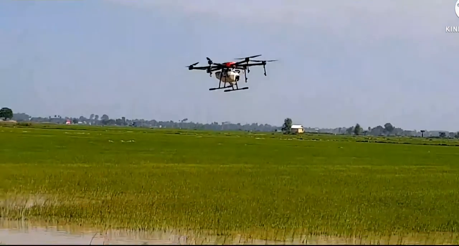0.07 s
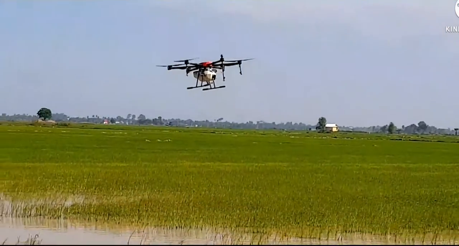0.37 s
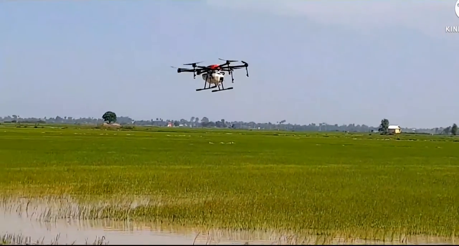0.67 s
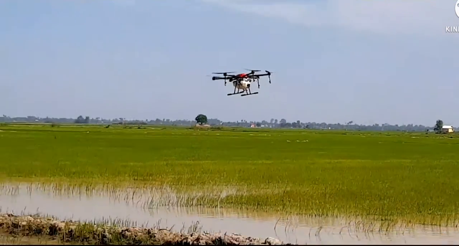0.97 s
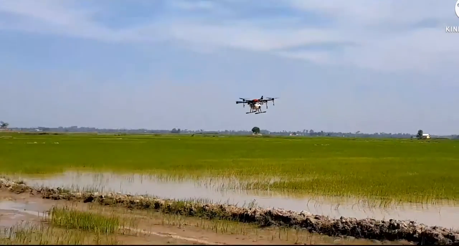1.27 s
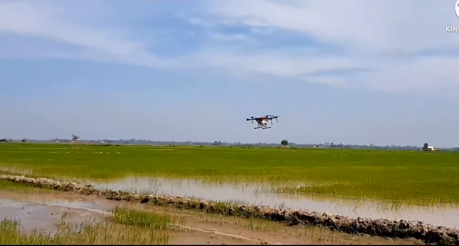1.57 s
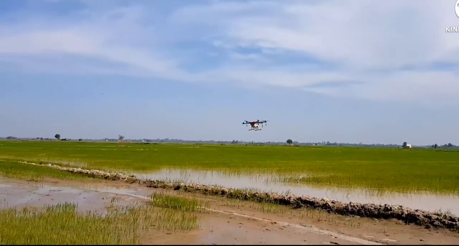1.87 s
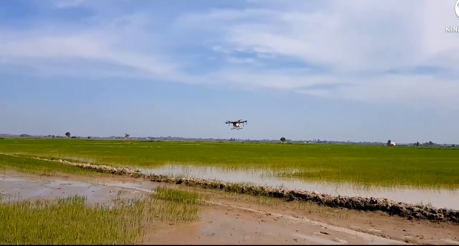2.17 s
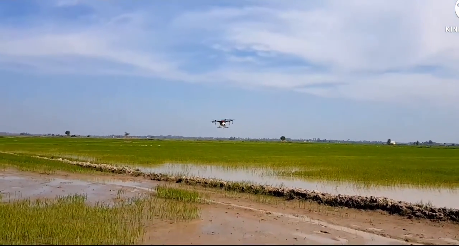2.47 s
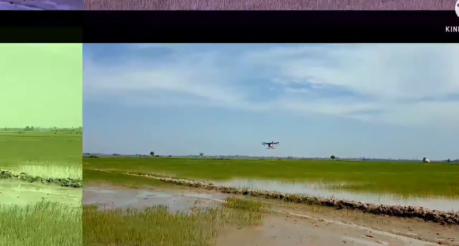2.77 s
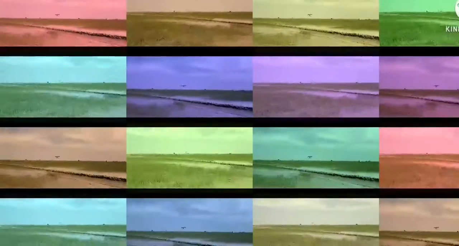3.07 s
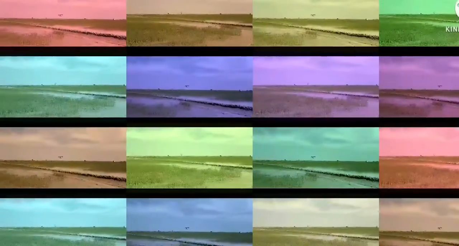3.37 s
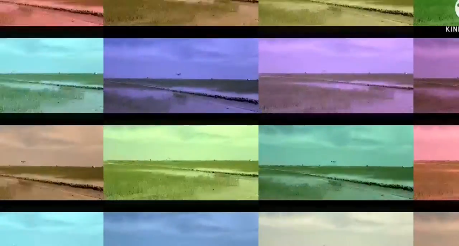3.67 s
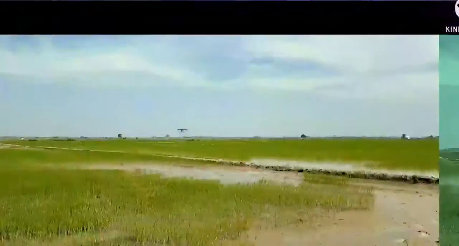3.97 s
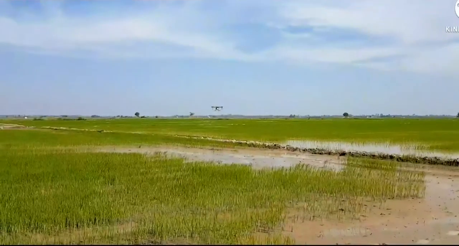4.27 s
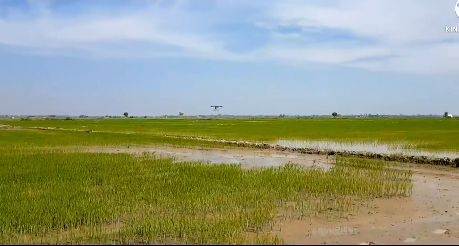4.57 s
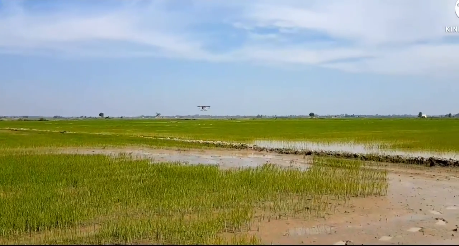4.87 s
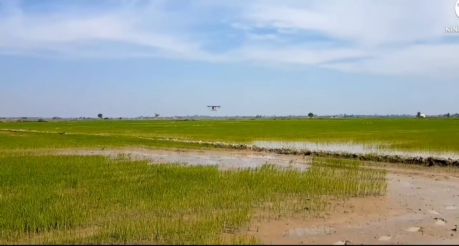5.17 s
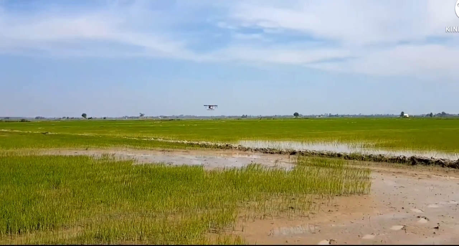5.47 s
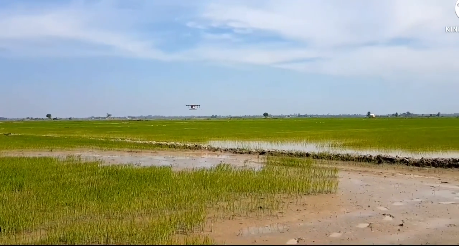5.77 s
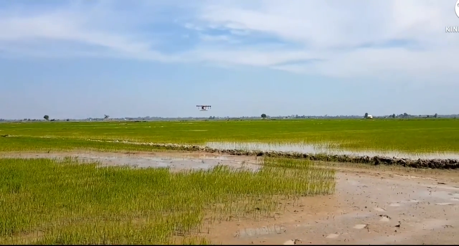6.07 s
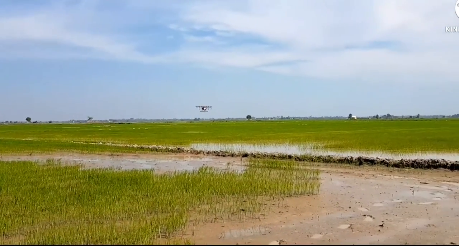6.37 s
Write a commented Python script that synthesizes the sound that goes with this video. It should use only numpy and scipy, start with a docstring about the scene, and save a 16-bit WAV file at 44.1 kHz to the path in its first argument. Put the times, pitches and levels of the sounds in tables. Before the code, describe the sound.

From the start, a six-rotor farm drone buzzes roughly, close by over open fields. Its rotors throb against each other, the blades chop the air, and the motors add a thin whine and a wavering whistle. Gusts of wind rumble on the microphone. Between about 1.2 and 2.7 seconds, sharp pops and crackles hit the microphone, mostly on the right, loudest near 1.2 and 2 seconds. A dull wind thump follows near 2.9 seconds. The buzz swirls gently upward as the drone leaves, then fades from about 3 to 4.3 seconds while the gusts die down, with a few faint knocks around 4 seconds. After that the drone is far away and much quieter, a thin, higher hum with a faint whine and hiss. A light breeze, faint crackle and soft thumps continue until the end, with a stronger thump at about 6.5 seconds.

```python
"""First you hear the rough buzz of a six-rotor farm drone hovering close by over rice fields. Its rotors throb
against each other, their blades chop the air, and the motors whine on top. The echo off the flooded field makes
the buzz swirl upward as the drone flies off. Then the scene changes: the near sound fades out while a thin,
higher drone from far away fades in. Wind rumbles, crackles and bumps on the microphone throughout."""
import sys
import numpy as np
from scipy import signal
from scipy.fft import rfft, irfft
from scipy.io import wavfile
from scipy.ndimage import uniform_filter1d

SR = 44100
rng = np.random.default_rng(int(sys.argv[2]) if len(sys.argv) > 2 else 0)


def log_audio(samples):
    """Write samples as a 16-bit WAV file to the path given in sys.argv[1]."""
    # one column per channel
    frames = np.atleast_2d(samples).T
    # limit to full scale, then quantise
    limited = np.clip(frames, -1, 1)
    pcm = np.round(limited * 32767).astype(np.int16)
    wavfile.write(sys.argv[1], SR, pcm)


N = 291942
T = np.arange(N) / SR
HZ = np.fft.rfftfreq(N, 1 / SR)
FAR_FROM_S, NEAR_UNTIL_S = 3, 4.31  # the far sound fades in between these times

# Tone colours of the wind. Each row: frequency in Hz, gain in dB.
GUST_COLOUR = [(15, -8), (30, -12), (45, -4), (62, 2.5), (100, -8.5), (135, -6), (200, -16), (300, -15.5),
               (600, -52.5)]
BREEZE_COLOUR = [(15, -29), (40, -8), (80, -5), (115, -4), (160, -12.5), (240, -24.5), (400, -27.5),
                 (900, -56), (4000, -78)]
EDDY_COLOUR = [(20, -34), (80, 4), (130, -4.5), (250, -14.5), (420, -15.5), (800, -51), (3000, -80)]
NEAR_CRACKLE_COLOUR = [(100, -21), (300, 1.5), (600, 1.5), (1200, -4.5), (2600, -7), (4200, -21),
                       (7000, -50)]
FAR_CRACKLE_COLOUR = [(130, -41), (300, -8), (550, 4.5), (900, -5), (1500, -26), (3000, -34), (6000, -60)]
# Strength of the crackle. Each row: time in seconds, level in dB.
NEAR_CRACKLE_DB = [(0, -60), (1.2, -60), (1.5, -50.5), (1.9, -45.5), (2.1, -40.5), (2.45, -43),
                   (2.8, -47.5), (3.3, -57), (3.95, -64), (4.3, -73)]
FAR_CRACKLE_DB = [(4.3, -64.5), (4.9, -65), (5.5, -63), (6.05, -61), (6.62, -59)]
# Gusts. Each row: time of the peak in seconds, length in seconds, level in dB.
WIND_GUSTS = [(0.142, .2, -42.5), (0.808, 0.33, -41), (1.189, 0.12, -38.5), (1.65, 0.86, -38.5),
              (2.314, 0.17, -39), (2.84, 0.45, -42), (3.331, .16, -40.5), (3.771, 0.32, -47.5)]
# Thumps of wind. Each row: start in seconds, level in dB, ring pitch in Hz.
WIND_THUMPS = [(2.867, -24, 80.1), (4.575, -37.5, 108.2), (4.76, -37, 126), (5.047, -34, 120),
               (5.137, -36, 113), (5.225, -31.5, 98), (5.246, -52, 112), (5.771, -38, 122),
               (5.901, -40.5, 97), (6.04, -34.5, 132), (6.076, -35, 109.1), (6.369, -39, 100),
               (6.44, -41, 101.2), (6.532, -25, 116)]
# Sharp pops and knocks on the microphone, mostly on the right.
# Each row: start in seconds, level in dB, ring pitch in Hz, click gain in dB, top of the click in Hz,
# left minus right in dB, swings of the ring, scuff from 0 to 1.
SHARP_MIC_POPS = [(1.2173, -13, 386.5, -9, 1490, -23, 6.9, 0.06),
                  (1.2217, -14.5, 132, -6.5, 2900, -31, 3.5, 0.04),
                  (1.549, -27, 503, 1, 3504, -20, 4, 0.02), (1.688, -30, 424, -10, 2400, -22, 5, 0.04),
                  (1.7604, -24, 111.1, 0, 3145, -8, 4.2, 0.1),
                  (1.8254, -27, 590, 2.5, 3576, -22, 4.83, 0.01),
                  (1.9686, -19.5, 424.5, -17, 1514, -30, 6.4, 0.1),
                  (1.9709, -14, 84, -10.5, 3230, -30, 7, 0.22), (2.3212, -25, 2300, 8, 5800, -26, 5, 0.05),
                  (2.478, -40, 448, -5, 1450, -22, 4.8, 0.3), (2.648, -22, 481, -2.5, 1380, -26, 5.6, 0.04),
                  (2.653, -28, 420, -4, 997, -26, 4, 0.07), (3.898, -39.5, 300, -5, 1302, -14, 4.6, 0.12),
                  (3.9308, -35, 222, -8, 1194, -22, 5.2, 0.2),
                  (3.9745, -38, 303.4, -3.5, 1390, -22, 5.1, 0.09),
                  (4.015, -33, 277, -6.5, 1200, -14, 5, 0.1),
                  (4.092, -47, 305, -3.5, 1009, -16.5, 5.2, 0.26),
                  (4.879, -44, 510, -12, 1500, -17, 9.3, 0.03), (5.177, -41, 946, -8, 2200, 2, 9.5, 0.18),
                  (6.33, -39, 600, -9, 1600, -20, 6.1, 0.1)]

# Speeds of the three rotor pairs, far and near. Each row: time in seconds, blade passes per second.
FAR_FAST_PAIR = [(4.1, 138), (4.7, 140), (5.2, 134.7), (5.5, 135.2), (5.9, 133.6), (6.25, 137.6),
                 (6.62, 133.4)]
FAR_MIDDLE_PAIR = [(4.099, 124.9), (4.851, 125.5), (5.202, 127), (5.501, 127.5), (6.203, 126.6),
                   (6.62, 125.1)]
FAR_SLOW_PAIR = [(4.098, 120.8), (5, 121.9), (5.7, 121.5), (6.62, 121.2)]
NEAR_FAST_PAIR = [(0, 90), (.3, 90.37), (.8, 89), (1.2, 88.55), (1.6, 87.28), (2, 86.42), (2.6, 87.72),
                  (2.9, 87.54), (3.3, 88.35), (4.3, 88.9)]
NEAR_MIDDLE_PAIR = [(0, 80.56), (0.503, 80.3), (1, 79.22), (1.605, 77.5), (2.3, 78.66), (3, 79.43),
                    (3.399, 80.53), (4.297, 80.1)]
NEAR_SLOW_PAIR = [(0, 78.1), (0.496, 76.78), (1.001, 75.37), (1.6, 74.42), (2.401, 74.3), (3.303, 75.7),
                  (4.301, 75.8)]
# Tones of the rotors' hum and the motors' magnetic whine. Each row: multiple of the blade-pass rate,
# then relative level in dB for the fast, middle and slow pair.
FAR_HUM_TONES = [(1, -7.5, -8, -0.5), (2, -5, -25, -16), (3, -16.5, -15, -13), (4, -9.5, -9, -7),
                 (6, -18, -16.5, -21)]
NEAR_HUM_TONES = [(1, 1, 6.5, -2.5), (2, -4, -7, -10.5), (3, -26.5, -24, -11.5), (4, -26, -28, -19.5)]
MAGNETIC_TONES = [(28, -28, -30, -40), (32, -33, -40, -18)]
# Tone colours of the drone's buzz and hiss. Each row: frequency in Hz, gain in dB.
FAR_BUZZ_COLOUR = [(130, -17), (220, -4), (275, -12.5), (296, -57), (371, -8.5), (439, -11), (499, -3),
                   (586, -19.5), (1500, -32), (1950, -28), (3300, -120)]
FAR_HISS_COLOUR = [(710, -52), (1200, -19), (1600, -11), (2090, -7), (2350, -1.5), (2650, -3),
                   (2850, -12.5), (3030, -15.5), (3350, -10.5), (3720, -17.5), (4050, -12.5), (4750, -12.5),
                   (5170, -8.5), (6260, -13.5), (6970, -9.5), (8170, -19), (9500, -23.5), (11500, -24),
                   (15300, -19)]
OVERHEAD_COLOUR = [(110, 0), (190, 0), (205, -22), (311, -22), (423, -24), (611, -3.5), (702, -3),
                   (884, -17.5), (1050, -15), (1360, -19), (1880, -17), (2160, -25.5), (2850, -24.5),
                   (4450, -21.5), (7500, -47.5), (9750, -85), (16500, -120)]
TURNING_COLOUR = [(110, -49), (190, 0), (301, 2.5), (410, -7.5), (681, -1.5), (871, -10.5), (1200, -2.5),
                  (1590, -17), (1910, -7.5), (2090, -17), (2300, -9.5), (2640, -18), (2850, -20.5),
                  (4950, -18.5), (7500, -62.5), (9750, -34.5), (16500, -120)]
LEAVING_COLOUR = [(110, -54), (190, -7.5), (341, 7), (429, -18), (516, -6.5), (566, -19), (692, -12),
                  (1300, -4), (1490, -12), (1790, -5), (2090, -27), (2370, -8), (2640, -19.5), (4510, -14),
                  (7500, -53), (9750, -57), (16500, -120)]
NEAR_HISS_COLOUR = [(3820, -14), (6500, -11.5), (7240, -12.5), (12600, -8.5), (13700, -8), (14600, -16),
                    (15300, -37)]
# Whine of the motors and their controllers.
# Each row: pitch in Hz, relative level in dB, waver as a share of the pitch.
FAR_WHINE_NOTES = [(2340, -8, 0.00307), (2340, -21, 0.011), (2530, -13.5, 0.00773), (5260, -23, 0.012)]
NEAR_WHINE_NOTES = [(13150, -16, .0008), (13380, -16, .0013), (13665, -20, .0008), (14035, -15, .0008),
                    (14145, -18, .0008)]
# Blurred motor tones. Each row: centre in Hz, relative level in dB, width in Hz.
FAR_WHINE_BANDS = [(5110, -11, 280), (6900, -27, 230)]
WHISTLE_BANDS = [(4410, -4.5, 74)]
# How the drone's sounds swell and sink. Each row: time in seconds, gain in dB.
FAR_DRONE_DB = [(4.34, -67.5), (4.75, -65.5), (5.05, -59), (5.5, -61), (5.95, -58), (6.25, -59.5),
                (6.62, -58.5)]
FAR_HUM_AND_BUZZ_DB = [(4.3, -0.5), (4.75, -2), (5, -1.5), (6.6, -1)]
FAR_WHINE_DB = [(4.3, 4), (4.75, 0.5), (5.1, 0.5), (5.5, -0.5), (5.9, 3), (6.15, -3.5), (6.45, 3.5),
                (6.62, -6)]
MOTOR_FACING_DB = [(0, -5), (.3, -5), (1.1, -5.5), (2.4, -1), (2.85, 0), (3.3, -5), (4.3, 2)]  # louder as the motors turn to the listener
WHISTLE_SWELL_DB = [(0, -71), (.15, -66), (.27, -59.5), (.5, -64), (.7, -64), (.95, -69), (1.2, -61),
                    (1.33, -69), (1.52, -58.5), (1.7, -69), (1.95, -68), (2.17, -59), (2.55, -65),
                    (2.85, -56.5), (3.08, -61), (3.25, -66), (3.6, -71), (4.2, -83)]
# Strength of the near drone. Each row: time in seconds, hum gain in dB, buzz gain in dB.
NEAR_DRONE_DB = [(0, -31.5, -43), (.45, -36.5, -42.5), (.85, -34, -41), (1.2, -38.5, -40), (1.6, -37, -40),
                 (2.1, -38, -40.5), (2.45, -34, -43.5), (2.87, -38.5, -43), (3.39, -40.5, -48),
                 (3.9, -47, -57), (4.3, -69, -68.5)]
# Whistle of the loudest motor. Each row: time in seconds, pitch in Hz.
WHISTLE_HZ = [(0, 4405), (.27, 4448), (.7, 4410), (1.2, 4392), (1.55, 4366), (2.05, 4360), (2.3, 4392),
              (2.55, 4392), (2.85, 4362), (3.1, 4380), (3.35, 4432), (4.2, 4432)]
# Steady bright bands in the buzz. Each row: centre in Hz, width in Hz, boost in dB.
BUZZ_PEAKS = [(1538, 42, 6), (2265, 91, 3), (2870, 200, 6.5), (3440, 300, 4), (3990, 150, 3),
              (4780, 200, 0.5), (5800, 620, 7)]
# The flight. Each row: time in seconds, stage (0 is overhead, 1 turning, 2 leaving).
FLIGHT_STAGE = [(.7, 0.19), (1.9, 0.64), (3.2, 1.734)]
# Echo off the flooded field. Each row: time in seconds, lag behind the direct sound in seconds.
ECHO_LAG = [(0, .00118), (1, .00109), (1.9, .001), (2.5, .0009), (3.1, .00085), (4.3, .00083)]

# How alike left and right are. Each row: frequency in Hz, likeness (0 is unrelated, capped at 0.99).
GUST_LIKENESS = [(30, 0.18), (70, 0.43), (200, 0.72)]
FAR_LIKENESS = [(60, 0.14), (150, 0.1), (380, 0.99), (940, 0.39), (2370, 0.49), (5940, 0.84), (8500, 0.77),
                (14900, 0.2)]
NEAR_LIKENESS = [(60, 0.84), (150, 1.04), (400, 1.1), (1000, 1), (2300, 0.33), (5000, 0.74), (9000, 0.4),
                 (15000, 0.6)]
# How far the left wave runs ahead of the right. Each row: frequency in Hz, lead in radians.
FAR_LEFT_LEAD = [(60, -3.5), (2500, 1), (7000, 1.2), (15000, 7)]
NEAR_LEFT_LEAD = [(60, -0.16), (950, 0.5), (1720, 0.76), (2330, -0.2), (3620, 1.05), (4310, -1.3),
                  (5080, 1.1), (8000, -0.9), (13000, -2), (15000, -1)]
# Balance of the microphone's two openings. Each row: frequency in Hz, left minus right in dB.
FAR_BALANCE = [(60, 26), (150, 32), (380, 7), (550, 0.5), (940, 3.5), (2370, 0), (5940, 0.5), (8500, -1),
               (14900, 17)]
NEAR_BALANCE = [(60, -3.5), (150, -1.5), (380, -1), (940, 2.5), (2370, 2), (5940, 1), (14900, 3)]


def from_db(db):
    """Turns decibels into a factor to multiply by."""
    return 10 ** (np.asarray(db) / 20)


def unit(x):
    """Scales a signal to an average strength (rms) of one."""
    return x / np.sqrt(np.mean(x ** 2) + 1e-20)


def over_time(rows, column=1):
    """Joins one column of a table with straight lines in time."""
    rows = np.asarray(rows)
    return np.interp(T, rows[:, 0], rows[:, column])


def over_frequency(rows):
    """Joins a table's points on a scale where all octaves are equally wide."""
    hz, value = np.transpose(rows)
    return np.interp(np.log(HZ + 1), np.log(hz + 1), value)


def colour(x, shape):
    """Turns each frequency up or down to follow a tone colour."""
    return irfft(rfft(x) * from_db(over_frequency(shape)), N)


def wander(per_s):
    """A smooth random wobble of strength one, moving up to about per_s times a second."""
    steps = len(np.arange(0, N + 64, 64))
    hz = np.fft.rfftfreq(steps, 64 / SR)
    slow = irfft(rfft(rng.standard_normal(steps)) / (1 + (hz / per_s) ** 4), steps)
    return unit(np.interp(np.arange(N), 64 * np.arange(steps), slow))


def stereo(two_signals, likeness, lead, balance):
    """Mixes two unrelated signals into a partly alike left and right, keeping their average's level."""
    first, second = rfft(two_signals)
    same = np.clip(over_frequency(likeness), 0, .99)
    tilt = from_db(over_frequency(balance) / 2)
    shared = same * np.exp(-1j * over_frequency(lead)) / tilt
    own = np.sqrt(1 - same ** 2) / tilt
    mean_gain = np.sqrt(abs(tilt + shared) ** 2 + own ** 2) / 2
    return irfft(np.array([tilt * first, shared * first + own * second]) / mean_gain, N)


def gust_level(breeze_db, gusts):
    """The wind's level in dB: each gust swells and sinks on top of the breeze."""
    power = from_db(breeze_db) ** 2
    for peak_s, length_s, db in gusts:
        power = power + (from_db(db) * np.exp(-2 * ((T - peak_s) / length_s) ** 2)) ** 2
    return 10 * np.log10(power + 1e-20)


def wind(level_db, shape, lumpy_db):
    """Air swirling on the microphone makes a low, lumpy rumble."""
    swirls = colour(rng.standard_normal((2, N)), shape) * from_db(lumpy_db * wander(51))
    return unit(swirls) * from_db(level_db)


def crackle(shape, level, per_s, spread_db, left_db=-16.5):
    """Small flicks of wind, most of them faint, hit mainly the microphone's right opening."""
    sizes = from_db(spread_db * np.minimum(rng.exponential(1, N), 3)) * rng.choice([-1, 1], N)
    flicks = colour(sizes * (rng.random(N) < per_s / SR), shape)
    return from_db([[left_db], [0]]) * unit(flicks) * from_db(over_time(level))


def bump(start_s, db, hz, click_db, top_hz, pan_db, swings, scuff, scuff_s=0.0037):
    """A blow on the microphone gives a dull click with a brief scuff, then a few swings of pressure."""
    t = np.arange(SR // 5) / SR
    ring = np.sin(2 * np.pi * hz * t) * np.exp(-np.log(1000) * t * hz / swings)
    blow = scuff * rng.standard_normal(len(t)) * np.exp(-t / scuff_s) - (t == 0)
    click = signal.sosfilt(signal.butter(6, top_hz, fs=SR, output="sos"), blow) * SR / 2 / top_hz
    sides = from_db([[pan_db / 2], [-pan_db / 2]])
    sound = sides / sides.mean() * from_db(db) * (ring + from_db(click_db) * click)
    out = np.zeros((2, N))
    slot = out[:, round(start_s * SR):][:, :len(t)]
    slot += sound[:, :slot.shape[1]]
    return out


def pops_and_thumps():
    """Sharp pops and knocks on the microphone, mostly on the right, and dull thumps of wind."""
    pops = sum(bump(*row) for row in SHARP_MIC_POPS)
    thumps = sum(bump(*row, click_db=-24, top_hz=606, pan_db=2.5, swings=8.9, scuff=0.24)
                 for row in WIND_THUMPS)
    return pops + thumps


def shimmer(x, depth_db):
    """Moving air makes patches of the sound, about 0.1 s long and 300 Hz wide, swell and fade."""
    spectra = signal.stft(x, nperseg=1024, noverlap=768)[2]
    patches = rng.standard_normal(spectra.shape[:0:-1]).T
    for _ in range(2):
        patches = uniform_filter1d(uniform_filter1d(patches, size=6, axis=0), size=16, axis=1)
    gain = unit(from_db(depth_db * unit(patches)))
    return signal.istft(spectra * gain, nperseg=1024, noverlap=768)[1][:, :N]


def motor_note(hz, waver, fading_db=3):
    """One pure motor tone that wavers in pitch and loudness."""
    cycles = np.cumsum(hz * (1 + waver * wander(12))) / SR
    return unit(np.cos(2 * np.pi * cycles) * from_db(fading_db * wander(9)))


def motor_blur(bands):
    """Motors at slightly different speeds merge into narrow bands of noise."""
    power = sum(from_db(db) ** 2 / width * np.exp(-2 * ((HZ - hz) / width) ** 2)
                for hz, db, width in bands)
    strength = np.sqrt(sum(from_db(db) ** 2 for _, db, _ in bands))
    return strength * unit(irfft(rfft(rng.standard_normal((2, N))) * np.sqrt(power), N))


def motor_whine(notes):
    """Thin motor tones, each swelling and fading on its own; gives two unrelated signals."""
    return np.array([sum(from_db(db) * motor_note(hz, waver) for hz, db, waver in notes)
                     for _ in range(2)])


def motor_whistle():
    """The loudest motor whistles on one wavering note; a weaker note sits a little above it."""
    hz = over_time(WHISTLE_HZ)
    notes = motor_note(hz, waver=.0014, fading_db=1.8) + from_db(-8) * motor_note(1.02 * hz, waver=.003)
    return (from_db(-2) * notes + motor_blur(WHISTLE_BANDS)) * from_db(over_time(WHISTLE_SWELL_DB))


def blade_passes(speed, drift, flutter):
    """Counts passing blades over time; the flight controller keeps nudging the speed."""
    head_start = rng.random()
    per_s = over_time(speed) * (1 + drift * wander(2) + flutter * wander(20))
    return head_start + np.cumsum(per_s) / SR


def rotor_tones(pairs, tones, twin_db, drift, flutter):
    """The two rotors of a pair run slightly apart, so their tones throb; gives two unrelated signals."""
    out = np.zeros((2, N))
    for side in out:
        for pair, speed in enumerate(pairs):
            for size in (1, from_db(twin_db)):
                passes = blade_passes(speed, drift, flutter)
                for multiple, *pair_db in tones:
                    wave = np.cos(2 * np.pi * (multiple * passes + rng.random()))
                    side += size * from_db(pair_db[pair]) * np.sqrt(2) * wave
    return out


def blade_slaps(speed, uneven, drift):
    """Every passing blade makes one sharp slap of pressure; gives the blade count and the slaps."""
    passes = blade_passes(speed, drift, flutter=.3 * drift)
    at = np.flatnonzero(np.diff(np.floor(passes)))
    # a slap falls between two samples and is shared by them
    late = (np.ceil(passes[at]) - passes[at]) / (passes[at + 1] - passes[at])
    size = 1 + uneven * rng.standard_normal(N)[at]
    slaps = np.zeros(N)
    slaps[at], slaps[at + 1] = size * (1 - late), size * late
    return passes, unit(slaps)


def smear(slaps, spread_s=.007):
    """The drone's arms and tank smear each slap: every frequency gets its own small delay."""
    points_hz = np.arange(0, SR / 2, 170)
    delay_s = np.interp(HZ, points_hz, spread_s * rng.random(len(points_hz)))
    return irfft(rfft(slaps) * np.exp(-2j * np.pi * np.cumsum(delay_s) * HZ[1]), N)


def chopped_air(pairs, pair_db, slap_db, sharpness, uneven, drift):
    """Each passing blade gives a slap and a swish of swirling air; gives two unrelated signals."""
    out = np.zeros((2, N))
    for speed, db in zip(pairs, pair_db):
        passes, first = blade_slaps(speed, uneven, drift)
        _, twin = blade_slaps(speed, uneven, drift)
        swish = unit(np.exp(sharpness * np.cos(2 * np.pi * passes)) * rng.standard_normal((2, N)))
        slaps = unit(np.array([first + .5 * twin, twin - .5 * first]))
        out += from_db(db) * (swish + from_db(slap_db) * smear(slaps))
    return out


def far_drone():
    """Far away, the rotors make a thin chord over a soft buzz, a shimmering hiss and the motors' whine."""
    pairs = (FAR_FAST_PAIR, FAR_MIDDLE_PAIR, FAR_SLOW_PAIR)
    hum = rotor_tones(pairs, FAR_HUM_TONES, twin_db=-10.5, drift=.003, flutter=.00816)
    air = chopped_air(pairs, pair_db=(-2, 0, -3), slap_db=-0.5, sharpness=.46, uneven=.81, drift=.003)
    buzz = unit(colour(air, FAR_BUZZ_COLOUR)) * from_db(4.5 * wander(28))
    hum *= from_db(0.5 + 1.13 * wander(3.8))
    rotors = (hum + buzz) * from_db(over_time(FAR_HUM_AND_BUZZ_DB))
    hiss = shimmer(unit(colour(air, FAR_HISS_COLOUR)), depth_db=2.1)
    whine = motor_whine(FAR_WHINE_NOTES) + motor_blur(FAR_WHINE_BANDS)
    whine *= from_db(over_time(FAR_WHINE_DB))
    return (rotors + from_db(-3) * (hiss + whine)) * from_db(over_time(FAR_DRONE_DB))


def field_echo(x, echo_db=-10.5):
    """The flooded field sends back a weaker copy; as its lag shrinks, the sound swirls upward."""
    earlier = T - over_time(ECHO_LAG)
    return x + from_db(echo_db) * np.array([np.interp(earlier, T, side) for side in x])


def boost_buzz_peaks(air):
    """A few steady bright bands stand out in the buzz."""
    boost_db = sum(db * np.exp(-((HZ - hz) / width) ** 2) for hz, width, db in BUZZ_PEAKS)
    return irfft(rfft(air) * from_db(boost_db), N)


def turning_buzz(air):
    """The buzz blends from one tone colour to the next as the drone turns and leaves."""
    stage = over_time(FLIGHT_STAGE)
    return sum(np.maximum(1 - abs(stage - k), 0) * unit(colour(air, shape))
               for k, shape in enumerate((OVERHEAD_COLOUR, TURNING_COLOUR, LEAVING_COLOUR)))


def near_drone():
    """Close by, the rotors hum, the chopped air buzzes and hisses, and the motors whine and whistle."""
    pairs = (NEAR_FAST_PAIR, NEAR_MIDDLE_PAIR, NEAR_SLOW_PAIR)
    hum_db, buzz_db = over_time(NEAR_DRONE_DB, column=1), over_time(NEAR_DRONE_DB, column=2)
    facing_db = over_time(MOTOR_FACING_DB)
    hum = rotor_tones(pairs, NEAR_HUM_TONES, twin_db=-9, drift=.003, flutter=.006)
    low = np.array([unit(side) for side in hum]) * from_db(hum_db)
    air = chopped_air(pairs, pair_db=(0, -3, -4), slap_db=0.5, sharpness=1.25, uneven=.22, drift=.008)
    air = boost_buzz_peaks(air)
    magnetic_whine = rotor_tones(pairs, MAGNETIC_TONES, twin_db=-2, drift=.0047, flutter=.00187)
    buzz = shimmer(field_echo(turning_buzz(air)), depth_db=1.34)
    magnetic_whine *= from_db(1.3 * wander(13) + facing_db)
    middle = (buzz + magnetic_whine) * from_db(buzz_db + 1)
    noisy_air = air + from_db(9) * rng.standard_normal((2, N))
    hiss = shimmer(unit(colour(noisy_air, NEAR_HISS_COLOUR)), depth_db=2)
    high = (hiss + motor_whine(NEAR_WHINE_NOTES)) * from_db(buzz_db - 15 + 0.6 * facing_db)
    return low + middle + high + motor_whistle()


def scene():
    """The near drone in gusty wind gives way to the far one in a light breeze."""
    lull_db = -45.5 - 6.5 * np.maximum(T - 2.16, 0)  # the wind between the gusts dies down
    gusts = wind(gust_level(lull_db, WIND_GUSTS), GUST_COLOUR, lumpy_db=3)
    # a short burst of swirling air wraps each thump of wind
    bursts = [(start_s, 0.043, db - 11.5) for start_s, db, _ in WIND_THUMPS]
    eddies = wind(gust_level(-np.inf, bursts), EDDY_COLOUR, lumpy_db=6.5)
    breeze = wind(-59.5 + 4.5 * wander(1), BREEZE_COLOUR, lumpy_db=4)
    near = stereo(near_drone(), NEAR_LIKENESS, NEAR_LEFT_LEAD, NEAR_BALANCE)
    near += stereo(gusts, GUST_LIKENESS, NEAR_LEFT_LEAD, NEAR_BALANCE)
    near += crackle(NEAR_CRACKLE_COLOUR, NEAR_CRACKLE_DB, per_s=170, spread_db=4)
    far = stereo(far_drone() + breeze, FAR_LIKENESS, FAR_LEFT_LEAD, FAR_BALANCE) + eddies
    far += crackle(FAR_CRACKLE_COLOUR, FAR_CRACKLE_DB, per_s=130, spread_db=1.5)
    fade_out = np.clip((NEAR_UNTIL_S - T) / 0.021 + .5, 0, 1)
    fade_in = np.clip((T - FAR_FROM_S) / (NEAR_UNTIL_S - FAR_FROM_S), 0, 1)
    return fade_out * near + fade_in * far + pops_and_thumps()


def record(dry):
    """The recorder loses the deepest bass and the highest treble."""
    thinned = signal.lfilter(*signal.butter(2, 32, "highpass", fs=SR), dry)
    treble_cut = signal.firwin(511, 15450, window=("kaiser", 9), fs=SR)
    return signal.oaconvolve(thinned, treble_cut[None], "same")


dry = scene()
out = record(dry)
log_audio(out)
```